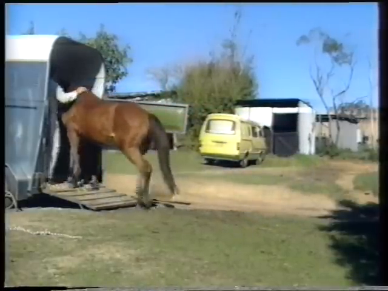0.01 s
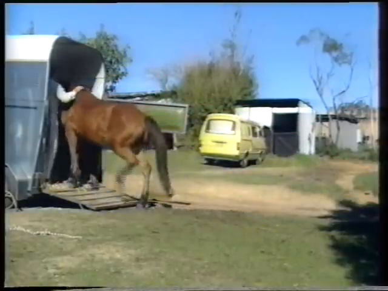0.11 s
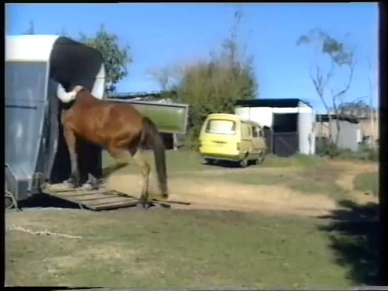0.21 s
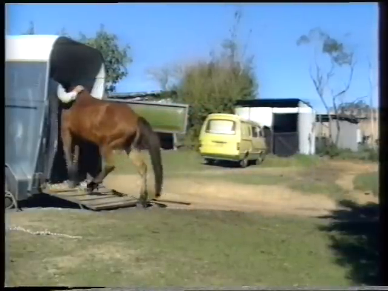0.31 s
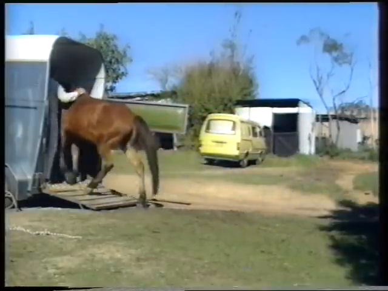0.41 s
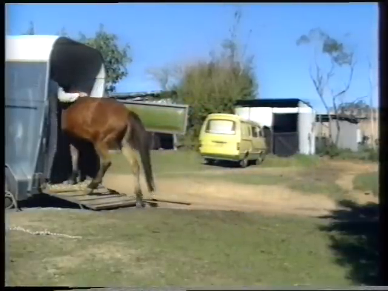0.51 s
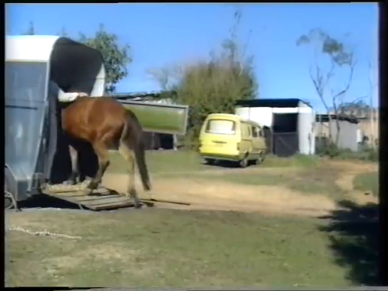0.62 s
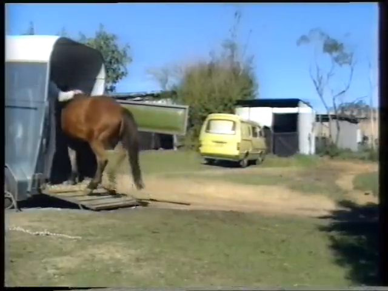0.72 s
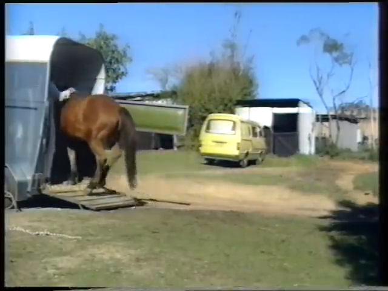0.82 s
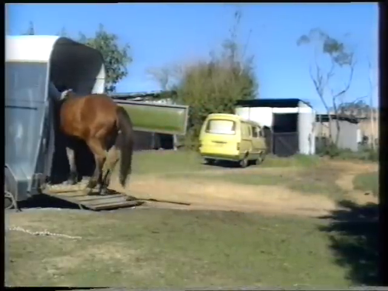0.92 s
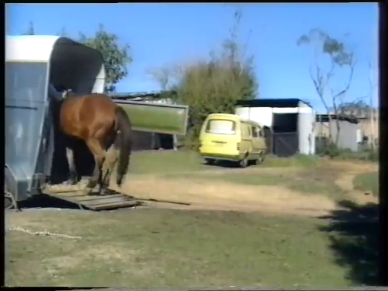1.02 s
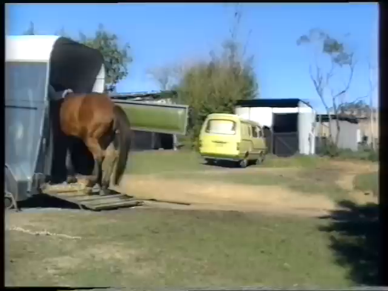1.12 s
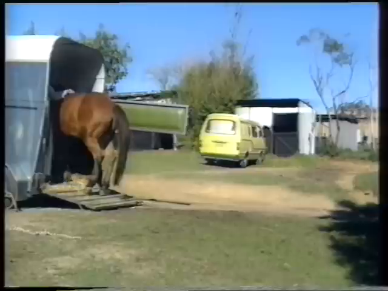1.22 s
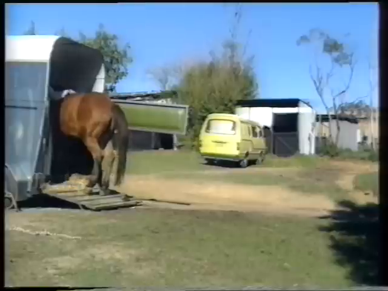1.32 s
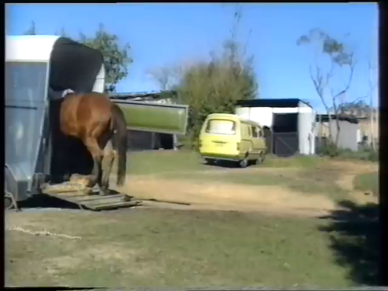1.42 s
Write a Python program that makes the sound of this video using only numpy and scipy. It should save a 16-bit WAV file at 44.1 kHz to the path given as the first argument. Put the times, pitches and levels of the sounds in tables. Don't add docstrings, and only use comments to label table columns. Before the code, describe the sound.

Horse hooves on a hollow wooden ramp. Faint knocks at 0-0.15 s, then the loudest stamp at 0.22 s, a deep plank boom with a rapid clatter of boards and gritty crack. Softer thuds follow at 0.32, 0.41, 0.52 and 0.6 s. A second heavy stamp at 0.82 s rattles until about 0.97 s, then light knocks and grit at 1.04-1.28 s. Low open-air murmur, steady tape hiss and thin, fluttering high whine throughout.

```python
import sys
import numpy as np
from scipy import signal
from scipy.fft import rfft, irfft
from scipy.io import wavfile
from scipy.ndimage import uniform_filter1d

SR = 44100
rng = np.random.default_rng(int(sys.argv[2]) if len(sys.argv) > 2 else 0)


def inscribe(sig):
    pcm = np.round(np.clip(np.atleast_2d(sig).T, -1, 1) * 32767)
    wavfile.write(sys.argv[1], SR, pcm.astype(np.int16))


def voltage_ratio(level):
    return 10 ** (np.asarray(level, float) / 20)


N = 66150
T = np.arange(N) / SR

# (frequency [Hz], level [dB per Hz])
AIR_SPECTRUM = [(18, -49), (30, 1.5), (173, -1.5), (265, -0.5), (297, -10.5), (382, -9), (437, -12),
                (2470, -31.5), (3500, -34.5), (6600, -40)]
# (frequency [Hz], level [dB per Hz])
HISS_SPECTRUM = [(1180, -45), (2000, -41), (2760, -17), (7260, -8), (13200, -11.5), (14700, -9), (15200, 1)]
# (frequency [Hz], left minus right [dB])
TRACK_TILT = [(60, 2.0), (240, 2.0), (950, 1.5), (3770, 0.5), (15000, 1.5)]
# (time [s], level [dB], length [s], time to fall 60 dB [s])
CRACKS = [(0.162, -55.5, 0.069, .1), (0.2214, -41.5, 0.011, 0.086), (0.256, -56, .003, 0.14),
          (0.267, -55, 0.11, 0.72), (0.423, -63.5, .03, 0.076), (0.605, -50.5, 0.0072, 0.21),
          (0.66, -66.5, 0.019, .1), (0.752, -58, 0.0011, 0.023), (0.8184, -47, 0.0043, 0.065),
          (0.826, -56, 0.02, .05), (1.12, -59.5, 0.035, .08), (1.199, -58, 0.036, 0.061)]
# (frequency [Hz], level [dB per Hz])
CRACK_SPECTRUM = [(3000, -5), (5000, -5), (8000, -3.5), (12000, -8), (13500, -16), (15000, -36)]
# (time [s], pitch [Hz], level [dB])
SNAPS = [(0.047, 1270, -32.5), (0.2181, 945, -7.5), (.2195, 1930, -16.5), (.2255, 1070, -15.5),
         (.2262, 2440, -22.5), (.2325, 1310, -12.5), (.2435, 1600, -15), (.245, 4080, -34),
         (.253, 1230, -17.5), (.2625, 1360, -23), (.2675, 1010, -25), (.282, 1470, -43), (.292, 1290, -39),
         (0.609, 990, -26.5), (0.8195, 1020, -19), (.8275, 917, -21.5), (0.8325, 950, -21),
         (.838, 930, -21), (.849, 1270, -33), (.85, 2860, -39), (.857, 805, -23), (.865, 900, -31),
         (.8805, 1280, -34), (.899, 1220, -30.5), (.907, 910, -31), (.933, 796, -35), (.944, 910, -37),
         (.969, 780, -39), (.977, 990, -31), (1.1165, 2260, -45), (1.121, 3160, -39.5), (1.122, 5100, -46),
         (1.157, 2540, -40), (1.166, 2260, -36), (1.172, 2450, -36), (1.178, 2200, -37), (1.186, 2280, -37),
         (1.192, 2400, -46)]
# (time [s], pitch [Hz], level [dB], swell [s], time to fall 60 dB [s])
RAPS = [(.218, 858, -18, 0.0011, 0.056), (.2184, 467.3, -19.5, 0.0037, 0.13),
        (.2186, 1000, -28, 0.0025, 0.13), (.226, 689, -28, 0.018, 0.082), (.258, 316, -23.5, 0.0066, 0.16),
        (.419, 725, -37, 0.015, 0.14), (.421, 1070, -41.5, 0.0099, 0.11),
        (.529, 2260, -54.5, 0.0043, 0.082), (.603, 658, -38.5, 0.016, .11), (.606, 439, -39, 0.014, 0.083),
        (.612, 983.5, -37, 0.018, 0.2), (.608, 820, -45, .01, .1), (.642, 325.4, -37, 0.011, 0.092),
        (.8212, 764, -18.5, 0.012, 0.029), (.826, 538.6, -21.5, 0.011, 0.13),
        (.8222, 1190, -33.5, 0.0085, 0.079), (.855, 375.5, -18.5, 0.0091, 0.13),
        (.894, 823, -32.5, 0.0065, 0.063), (.925, 715, -30.5, 0.0091, 0.078),
        (.965, 441.4, -31.5, 0.0077, 0.089), (.968, 690, -36, .006, 0.094), (1.051, 996, -45, 0.0091, .07),
        (1.071, 891, -39.5, 0.012, 0.2), (1.124, 679, -36, 0.012, 0.11), (1.119, 1385, -40, .004, 0.11),
        (1.165, 445, -34, 0.0096, 0.14), (1.131, 5500, -58, .01, .12), (1.141, 3800, -58, 0.011, .25),
        (1.216, 900, -41.5, 0.01, 0.12)]
# (time [s], pitch [Hz], level [dB], swell [s], time to fall 60 dB [s])
BENDS = [(.001, 230, -37, 0.0086, 0.078), (.2192, 256, -12, 0.0094, .2), (.2194, 179, -13.5, 0.0064, .08),
         (.239, 149.7, -9.5, 0.012, 0.12), (.268, 88, -20.5, .013, 0.13), (.284, 222.2, -13, 0.0068, .25),
         (.342, 200.4, -24.5, 0.013, 0.23), (.38, 267, -32.5, 0.023, 0.12), (.4, 99, -32.5, 0.011, .2),
         (.47, 217.5, -37.5, 0.014, 0.21), (.554, 254, -35, 0.031, 0.18), (.633, 97.2, -23.5, 0.026, 0.13),
         (.679, 227.4, -29, 0.012, 0.24), (.729, 249.3, -33, 0.0087, 0.17),
         (.829, 115.6, -12.5, 0.032, 0.23), (.8205, 278.8, -16, 0.0057, 0.17),
         (.8208, 154, -10.5, 0.0056, 0.076), (.851, 271.8, -10.5, 0.0095, 0.1),
         (.875, 220, -15.5, .022, .2), (.958, 206, -30.5, .01, 0.07), (.961, 263, -24.5, 0.0094, .1),
         (.986, 262.4, -28.5, 0.012, 0.19), (.972, 116.8, -25.5, .011, .16), (1.048, 92, -32, 0.014, .11),
         (1.045, 214.8, -30.5, .015, 0.14), (1.169, 218.6, -23, 0.018, 0.075), (1.24, 117, -40, .02, 0.12)]
# (time [s], boom [dB], clack [dB], grit [dB], contact length [s])
KNOCKS = [(0.0, -40.5, -44.5, -57.5, 0.028), (0.048, -70, -41.5, -58, 0.02),
          (0.117, -69, -48, -57.5, 0.032), (0.2163, -14, -23, -38.5, 0.019),
          (0.237, -20.5, -27, -63, 0.0049), (0.258, -42, -24.5, -67, 0.0068),
          (0.32, -26.5, -41, -59, 0.014), (0.414, -35.5, -45.5, -57.5, 0.019),
          (0.521, -34, -52, -58, 0.029), (0.6, -29.5, -31.5, -49, 0.034), (0.674, -33.5, -39.5, -66, 0.042),
          (.812, -38, -43, -57, .005), (0.818, -18, -22.5, -43, 0.02), (0.869, -22.5, -35, -50, 0.0077),
          (0.894, -29, -31, -47, 0.033), (0.958, -27.5, -35.5, -56, 0.025),
          (1.039, -31.5, -44.5, -59.5, 0.037), (1.115, -34.5, -36, -45.5, 0.025),
          (1.158, -31.5, -37, -51.5, 0.022), (1.209, -36.5, -43.5, -78, 0.012),
          (1.276, -44, -47, -84, 0.046)]
# (frequency [Hz], level [dB], time to fall 60 dB [s])
PLANK_MODES = [(88, -19, 0.35), (112.6, -3.5, 0.21), (152, -1, 0.14), (185.2, -1, 0.29), (220, 4, 0.12),
               (262.3, 1, 0.12), (311.9, 0, 0.11)]
# (frequency [Hz], level [dB], time to fall 60 dB [s])
BOARD_MODES = [(368.4, -1, 0.13), (431, -5.5, 0.24), (495.8, 10, 0.094), (581, 7.5, 0.037),
               (677, 9.5, 0.039), (761.4, 2, 0.12), (858, 3, 0.05), (976, 2, 0.13), (1100, -29, 0.073),
               (1290, -53, 0.058), (1360, -40, 0.18), (1570, -46, 0.071), (1770, -17, 0.068),
               (2000, -19, 0.023)]
# (frequency [Hz], level [dB per Hz])
GRIT_SPECTRUM = [(900, 0), (1500, -3), (2500, -5), (4000, -8.5), (6000, -19), (9000, -35)]


def evened(x):
    return x / np.sqrt(np.mean(x ** 2) + 1e-20)


def coloured(x, points, share=1):
    point_hz, point_db = np.transpose(points)
    hz = np.fft.rfftfreq(x.shape[-1], 1 / SR)
    level_db = np.interp(np.log(hz + 1), np.log(point_hz + 1), point_db)
    return irfft(rfft(x) * voltage_ratio(share * level_db), x.shape[-1])


def ring(x, hz, width_hz):
    r = np.exp(-np.pi * width_hz / SR)
    pole = r * np.exp(2j * np.pi * hz / SR)
    return 2 * signal.lfilter([1 - r], [1, -pole], x).real


def body(x, modes):
    out, power = np.zeros(N), 0
    for hz, db, t60 in modes:
        noise_gain = np.sqrt(2 * np.pi * 2.91 / t60 / SR)
        out += voltage_ratio(db) * ring(x, hz, 1.9 / t60) / noise_gain
        power += voltage_ratio(2 * db)
    return out / np.sqrt(power)


def grains():
    lumps = evened(uniform_filter1d(rng.standard_normal(N), size=120))
    lump_db = 1.5
    return evened(rng.standard_normal(N) * voltage_ratio(lump_db * lumps))


def yard():
    return voltage_ratio(-45.5) * evened(coloured(rng.standard_normal(N), AIR_SPECTRUM))


def tape_hiss():
    left, other = rng.standard_normal((2, N))
    same = 0.8
    right = same * left + np.sqrt(1 - same ** 2) * other
    return voltage_ratio(-54.5) * evened(coloured(np.array([left, right]), HISS_SPECTRUM))


def line_whine():
    slow, rough, tick_noise, beat_noise = rng.standard_normal((4, N))
    line_hz, fuzz_width_hz, ticks_per_s = 15625, 83, 120
    width = int(0.06 * SR)
    drift = evened(uniform_filter1d(uniform_filter1d(slow, width), width))
    flutter = voltage_ratio(6.5 * np.tanh(drift))
    tone = voltage_ratio(-58) * np.sin(2 * np.pi * line_hz * T)
    fuzz = voltage_ratio(-65.5) * evened(ring(ring(rough, line_hz, fuzz_width_hz), line_hz, fuzz_width_hz))
    tick_now = rng.random(N) < ticks_per_s / SR
    ticks = voltage_ratio(-72) * evened(ring(tick_noise * tick_now, line_hz, 900))
    beat = voltage_ratio(-76.5) * evened(ring(beat_noise, 11650, 250))
    whine = flutter * signal.hilbert(tone + fuzz + ticks + beat)
    return np.array([whine, whine * np.exp(-0.4j)]).real


def cracks():
    level = np.zeros(N)
    for start, db, length, t60 in CRACKS:
        after = np.maximum(T - start - length, 0)
        level += voltage_ratio(db - 60 * after / t60) * np.clip((T - start) / 0.0013, 0, 1)
    return level * evened(coloured(grains(), CRACK_SPECTRUM))


def snaps():
    t60, rise_s, roughness = 0.013, 0.00064, 0.31
    out = np.zeros(N)
    rough = 1 + roughness * evened(uniform_filter1d(rng.standard_normal(N), size=12))
    for start, hz, db in SNAPS:
        u = np.maximum(T - start, 0)
        level = voltage_ratio(db - 60 * u / t60) * np.minimum(u / rise_s, 1)
        out += level * np.sin(2 * np.pi * hz * u)
    return out * rough


def rings(table, wobble):
    out = np.zeros(N)
    width = int(0.003 * SR)
    rub = evened(uniform_filter1d(uniform_filter1d(rng.standard_normal((2, N)), width), width))
    for k, (start, hz, db, swell, t60) in enumerate(table):
        u = np.maximum(T - start, 0)
        a, b = wobble * np.roll(rub, 999 * k, axis=1)
        fade = voltage_ratio(db - 60 * np.maximum(u - swell, 0) / t60)
        level = fade * np.sin(np.pi / 2 * np.minimum(u / swell, 1))
        phase = 2 * np.pi * hz * u
        out += level * ((1 + a) * np.sin(phase) + b * np.cos(phase))
    return out


def raps():
    return rings(RAPS, 0.7)


def bends():
    return rings(BENDS, 0.15)


def force(column, rise_s, t60):
    shake_db, shake_t60 = -16, 1
    power = np.zeros(N)
    for row in KNOCKS:
        u = T - row[0]
        after = np.maximum(u - row[4], 0)
        fade = voltage_ratio(-60 * after / t60) + voltage_ratio(shake_db - 60 * after / shake_t60)
        power += (voltage_ratio(row[column]) * np.clip(u / rise_s, 0, 1) * fade) ** 2
    return np.sqrt(power)


def hooves():
    boom = body(force(1, 0.0086, 0.28) * rng.standard_normal(N), PLANK_MODES)
    clack = body(force(2, 0.00051, 0.15) * grains(), BOARD_MODES)
    wood_top_hz = 1886
    wood = signal.sosfilt(signal.butter(4, wood_top_hz, fs=SR, output="sos"), boom + clack)
    crunch = force(3, 0.0018, 0.19) * evened(coloured(grains(), GRIT_SPECTRUM))
    return wood + crunch


def scene():
    mono = yard() + cracks() + snaps() + raps() + bends() + hooves()
    late = voltage_ratio(-50) * np.roll(mono, 300)
    return np.array([mono + late, mono - late])


def band_limit(x):
    return signal.sosfilt(signal.butter(12, 17030, fs=SR, output="sos"), x)


def record(dry):
    low_cut_hz, top_hz = 68, 15850
    heard = signal.sosfilt(signal.butter(2, low_cut_hz, "high", fs=SR, output="sos"), dry)
    taped = heard + tape_hiss() + line_whine()
    left = coloured(taped[0], TRACK_TILT, 0.5)
    right = coloured(taped[1], TRACK_TILT, -0.5)
    treble_limit = signal.firwin(511, top_hz, window=("kaiser", 9), fs=SR)
    mix = signal.oaconvolve(np.array([left, right]), treble_limit[None], "same")
    return band_limit(mix)


dry = scene()
out = record(dry)
inscribe(out)
```